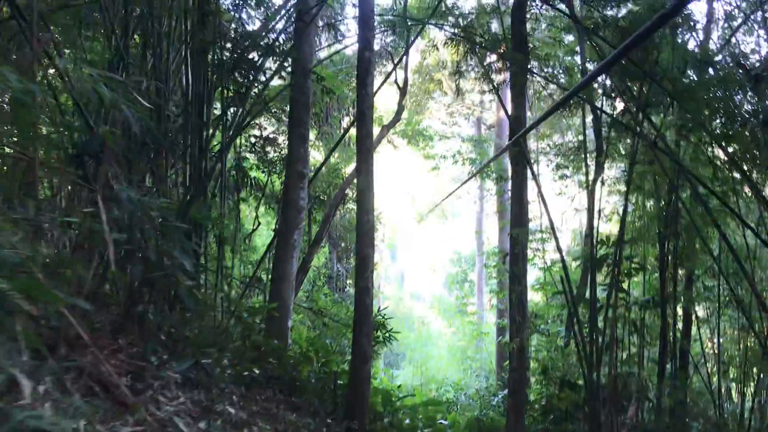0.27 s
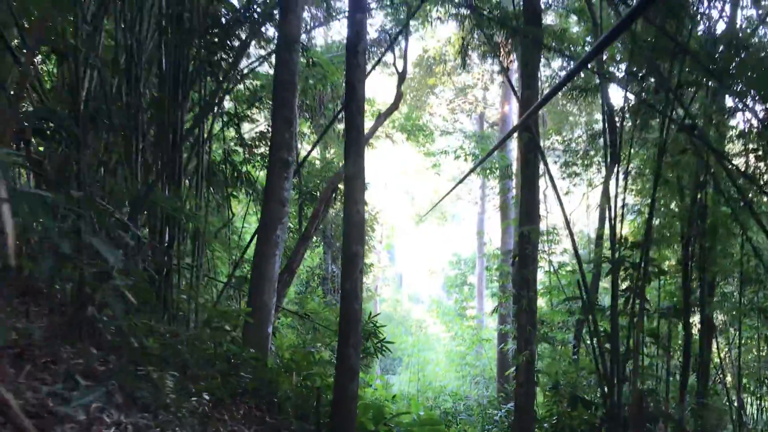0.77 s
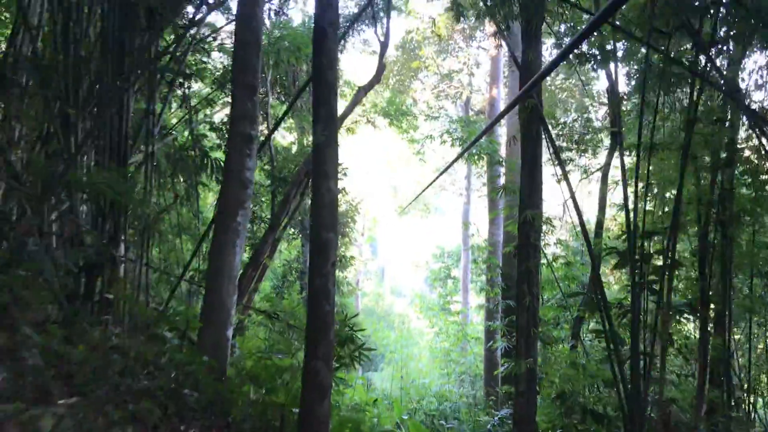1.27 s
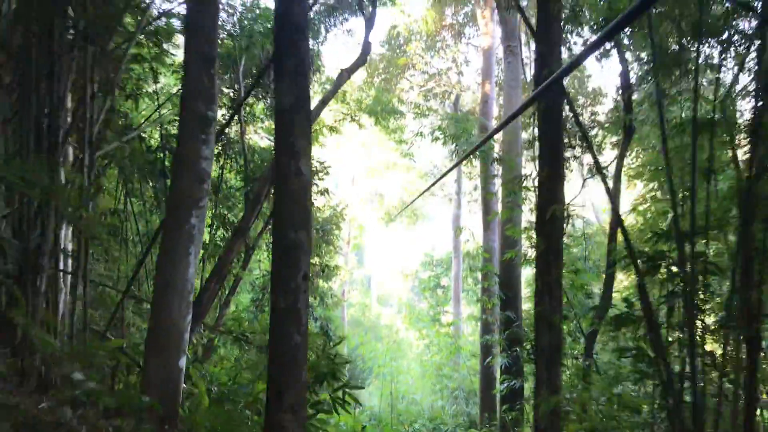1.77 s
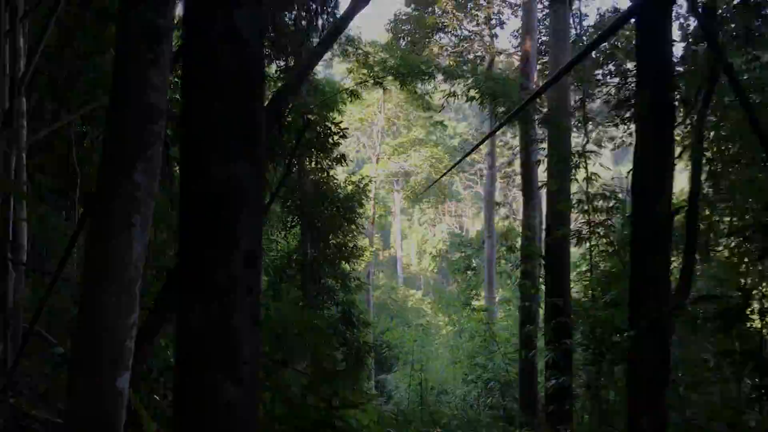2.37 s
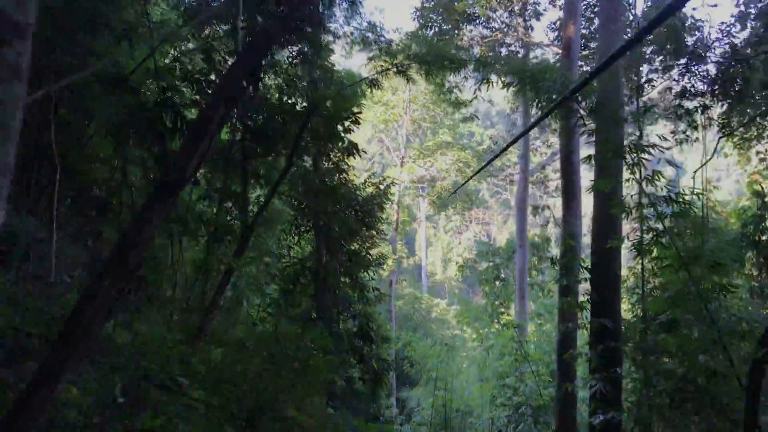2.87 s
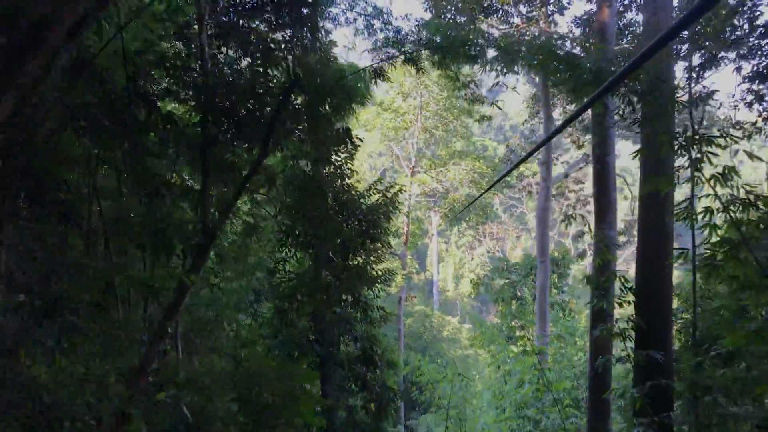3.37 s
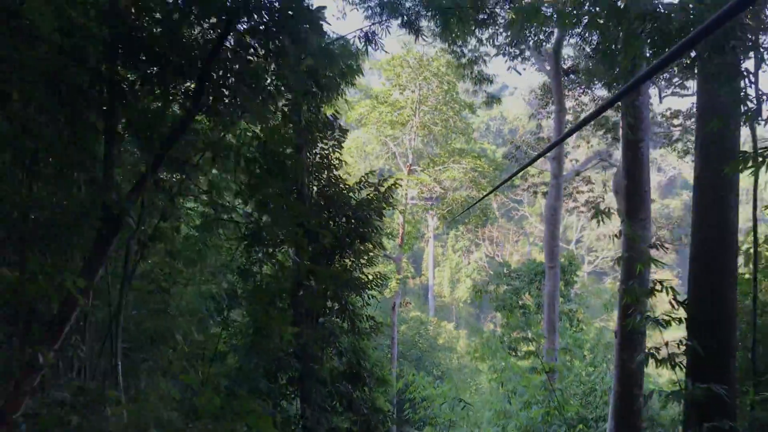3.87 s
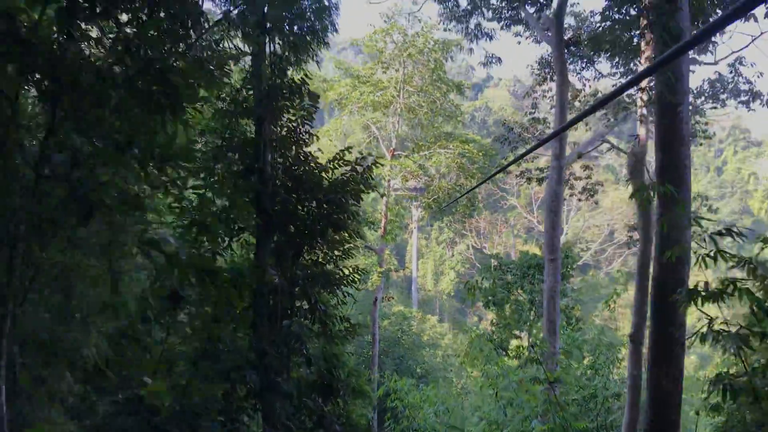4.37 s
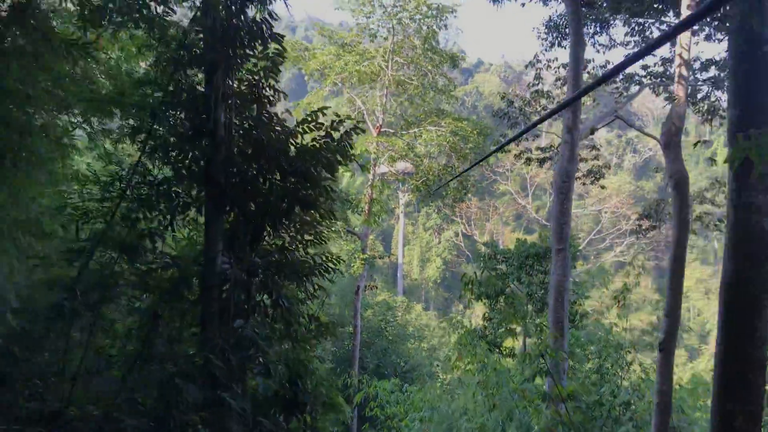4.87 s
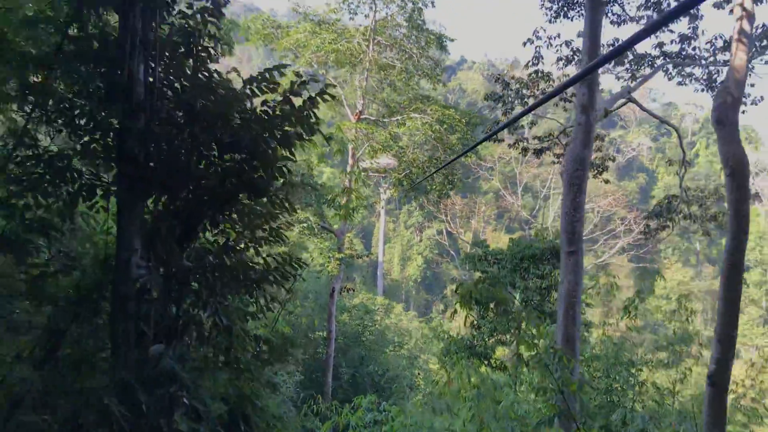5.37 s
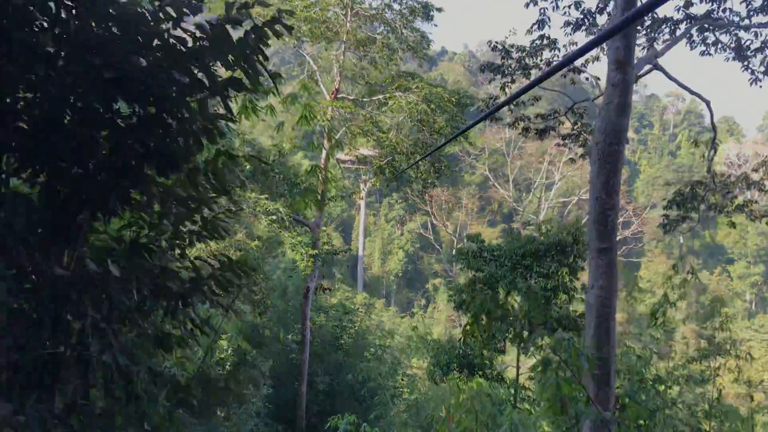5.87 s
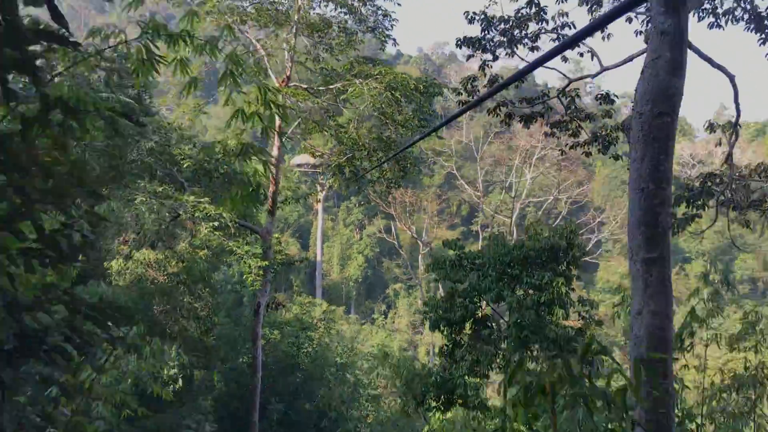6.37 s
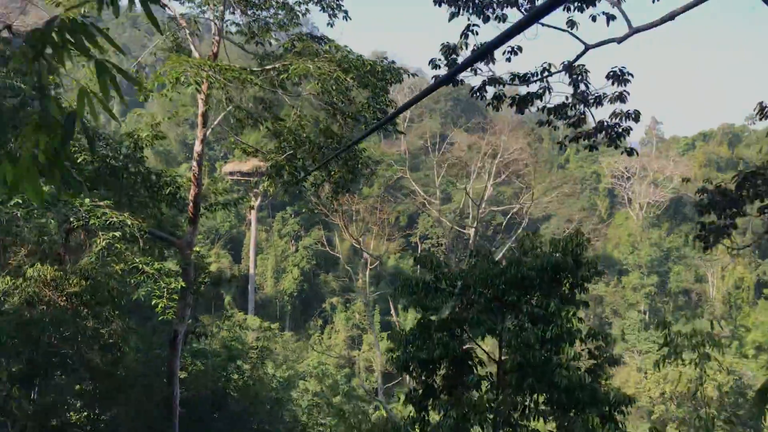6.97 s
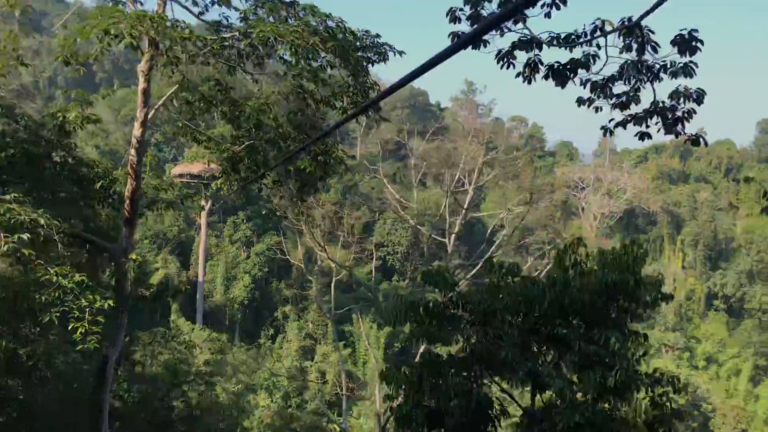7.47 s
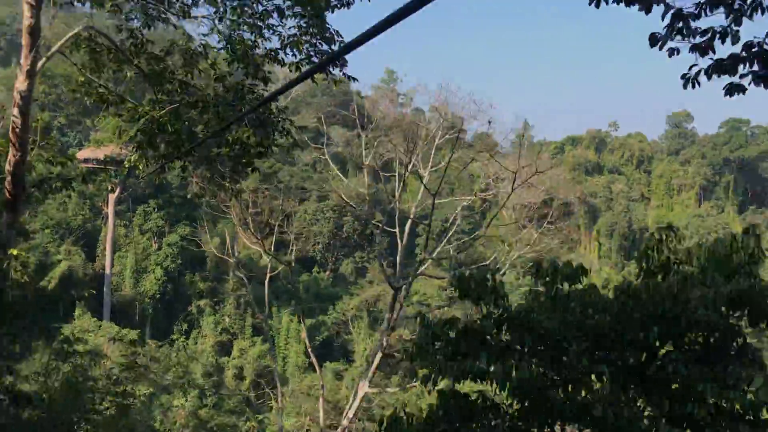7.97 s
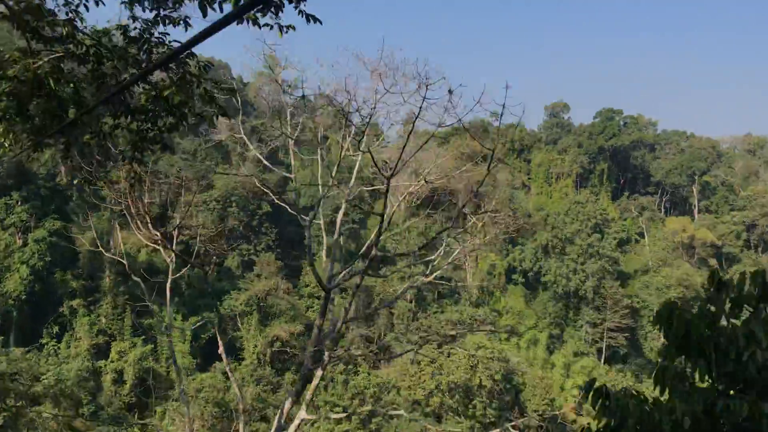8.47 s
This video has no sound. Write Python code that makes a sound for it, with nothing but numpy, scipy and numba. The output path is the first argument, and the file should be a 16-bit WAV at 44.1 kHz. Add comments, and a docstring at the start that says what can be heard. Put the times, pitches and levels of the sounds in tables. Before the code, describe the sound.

A two-wheeled trolley runs down a steel cable just above a phone, moving from the first instant. At 0 s it is a grainy, rather subdued metallic whir with fine ticks. Over the first 2 s it speeds up quickly, growing louder as drumming strands form a buzzing whine that slides upward. Around 2.5-3.5 s the rolling is fullest, ringing hard in the steel frame; near 4 s it eases slightly. From 4 to 7 s the climb slows, with neighbouring tones flaring and dropping in turn and a slight pitch shudder around 5.2 s and again near 7.3 s. The ticks fuse into a bright, sizzling hiss that gains on the body. Faint bass wind buffets, soft rushing air and a low leafy hush stay far underneath. At about 8.7 s it stops abruptly, still fast and high. Close, dry, outdoor mono sound.

```python
"""Trolley on a steel cable

A two-wheeled trolley rolls faster and faster down a steel cable, just above the rider's phone.
The cable strands drum on the wheels and whine in sine lines that climb with the wheel speed. Noise for
grit, bearings and uneven strands rings in the steel frame, under a bright top hiss with tiny cracks.
Filtered noise makes the faint wind rumble, the air rushing past and a low forest hush."""
import sys
import numpy as np
from scipy import signal
from scipy.fft import rfft, irfft, next_fast_len
from scipy.io import wavfile
from scipy.ndimage import uniform_filter1d
from numba import njit

SR = 44100
rng = np.random.default_rng(int(sys.argv[2]) if len(sys.argv) > 2 else 0)


def wav_record(signal):
    """Record a signal, one row per channel, as 16-bit PCM in the file named by sys.argv[1]."""
    frames = np.transpose(np.atleast_2d(signal))
    bounded = np.clip(frames, -1, 1)
    # unit amplitude maps onto the largest positive 16-bit level
    quanta = np.round(bounded * 32767).astype(np.int16)
    wavfile.write(sys.argv[1], SR, quanta)


N = 384993  # length [samples]

SLOW_HZ, FAST_HZ = 25, 90  # wheel speeds between which the "even steps of speed" below are spread [turns/s]
SIZZLE_HZ = 4700  # where the rolling body gives way to sizzle
TOP_HZ = 15750  # the phone passes nothing much above this
SETTLE_S, SETTLE_DB = 0.3, -12  # whine and comb start softer, until the wheels settle on the cable

# Air
# colour of the wind on the microphone: (frequency [Hz], relative level [dB per Hz])
WIND_COLOUR = [(20, -26), (32, -10), (45, 4.5), (70, 6.5), (130, -4.5), (250, -26), (600, -41)]
# wind level at low, middle and full speed: (level [dB], ...)
WIND_LEVEL_DB = (-65.5, -58.5, -56)
# short gusts: (middle [s], time to fall to 37 % [s], peak level [dB])
GUSTS = [(3.17, .05, -49), (3.42, .07, -54), (3.91, .05, -51.5), (4.037, .04, -54), (5.25, .03, -49),
         (6.21, 0.055, -61), (6.93, .04, -63), (7.01, .04, -53), (7.44, .05, -54), (7.98, 0.04, -57)]
# colour of the forest hush: (frequency [Hz], relative level [dB per Hz])
FOREST_COLOUR = [(150, -14), (250, -8.5), (320, 2.5), (400, -13.5), (550, -3.5), (700, 0), (1500, -17)]
# low hush of leaves: (time [s], level [dB])
HUSH_LEVEL = [(0, -49.5), (1, -54), (3, -56), (4, -63), (6, -68), (7, -58), (8.73, -55)]
# colour of the air rushing past the phone: (frequency [Hz], relative level [dB per Hz])
RUSH_COLOUR = [(60, -10), (130, 1), (200, 2.5), (280, -3.5), (400, -23), (800, -30.5)]
# level of that rush at even steps of speed: (level [dB], ...)
RUSH_LEVEL_DB = (-66, -65, -63.5, -61.5, -57)

# Wheel speed
# steady part of the speed: (time [s], wheel speed [turns/s])
WHEEL_SPEED = [(0, 24.6), (.14, 25.5), (.43, 28.6), (.75, 32.5), (1.4, 39.1), (2.0, 45.3), (2.5, 50.55),
               (2.7, 51.35), (3.07, 55.4), (3.4, 58.6), (3.74, 61.3), (4.05, 63.85), (4.3, 65.7),
               (4.7, 69.0), (5.17, 72.3), (5.45, 74.2), (6.0, 77.7), (6.6, 81.25), (7.0, 83.2), (7.3, 84.8),
               (7.8, 87.2), (8.3, 89.3), (8.73, 90.4)]
# short bouts of shudder: (middle [s], shudder rate [Hz], time to fall to 37 % [s], depth [turns/s])
SHUDDERS = [(5.165, 4.25, .4, .6), (5.72, 5.0, .15, .3), (7.28, 5.2, .45, .65), (7.79, 5.8, .2, .35),
            (8.585, 5.0, .14, .6)]

# Rolling noise
# rolling level before a fixed lift: (time [s], level [dB])
ROLL_LEVEL = [(0, -30), (.7, -28.5), (1.4, -25.5), (2.1, -23.5), (2.8, -22.5), (3.5, -22.5), (3.85, -25),
              (4.2, -26), (4.9, -24), (5.6, -24.5), (6.3, -25), (7.0, -25.5), (7.9, -26), (8.4, -24.5),
              (8.73, -25.5)]
# frame and wheel resonances: (frequency [Hz], width at half gain [Hz], gain [dB])
FRAME_RINGS = [(918, 216, -19), (1020, 190, -18.5), (1366, 138, -10), (1574, 251, 2), (2006, 130, -1),
               (2453, 520, -2), (2656, 210, -3), (2980, 270, -8), (3857, 565, -2.5), (5060, 1600, -40),
               (6080, 300, -19.5), (6520, 620, -10.5), (7290, 220, -16)]
# what the frame passes between the rings: (frequency [Hz], gain [dB])
FRAME_BED = [(200, -37), (500, -91), (800, -39), (2000, -2), (5500, -20), (9000, -22.5)]
# bearing rumble and uneven strands, as climbing bands: (centre [cycles/turn], width [cycles/turn])
STRAND_BANDS = [(5.2, 1.6), (25, 5), (36, 9), (51.5, 8), (78, 12), (100, 14)]
# how hard each band drives the frame, against the grit, at even steps of speed: (level [dB], ...)
STRAND_BANDS_DB = [(-19.5, -19.5, -18, -44), (-9.5, -13, -15.5, -15), (-5.5, -23.5, -22.5, -12),
                   (-6.5, -18, -14.5, -11.5), (-13, -17.5, -21, -15.5), (-20, -23, -15, -10)]
# sizzle against the rolling level, at even steps of speed: (level [dB], ...)
SIZZLE_LEVEL_DB = (-10.5, -5.5, -4.5, -.5)
# top hiss against the rolling level, at even steps of speed: (level [dB], ...)
TOP_LEVEL_DB = (-28, -18.5, -11, -8)
# high rings: (frequencies at even steps of speed [Hz], levels at low and full speed [dB], width [Hz])
HIGH_RINGS = [((9350, 9720, 9400, 10530), (1, -2.2), 990), ((12300, 12050, 11800, 12050), (-4.5, -1), 1100),
              ((14000, 14200, 14450, 14650), (0.5, 3), 1100)]
# shared level, added to each ring's own: (time [s], level [dB])
HIGH_RING_LEVEL = [(0, -64.5), (1, -50.5), (2, -39.5), (2.7, -37), (3.5, -39), (4.2, -43), (5, -45),
                   (6, -39.5), (7.6, -41), (8.2, -42), (8.73, -39)]

# Tones locked to the wheel
# fainter lines, among them the comb of the second wheel: (rate [cycles/turn], ...)
FAINT_ORDERS = [5.14, 6.03, 17.66, 18.41, 19.41, 19.61, 20.39, 21.61, 22.61, 24.62, 27.41]
# their strength before they grow with speed and the frame colours them: (level [dB], ...)
FAINT_LINES_DB = [-30.5, -39, -30.5, -42, -30, -30.5, -29.5, -23.5, -29.5, -25, -25.5]
# comb around double the strand rate: (rate [cycles/turn], ...)
COMB_ORDERS = [45.82, 46.8, 47.78, 48.86, 49.83, 51.7, 53.06, 54.02, 55.0]
# strength of each line within the comb: (level [dB], ...)
COMB_LINES_DB = [-7.5, -6, -3, -6, -7, -9, -12, -8, -4]
# strength of the whole comb at even steps of speed: (level [dB], ...)
COMB_STRENGTH_DB = (-21, -20.5, -21, -21, -21.5, -24.5)
# strongest lines: a bearing line, then the strand rate and its double, split by the turning wheel:
# (rate [cycles/turn], ...)
MAIN_ORDERS = [12.03, 21.39, 22.39, 23.39, 24.39, 25.39, 26.41, 50.78, 52.86]
# strength of each strong line: (at low speed [dB], at middle speed [dB], at full speed [dB])
MAIN_LINES_DB = [(-6, 0, 4.5), (-3, 0, -8.5), (-13, -3, -9.5), (-3, 3.5, -4), (-10, 6.5, 0.5),
                 (4, -6.5, -9.5), (-4, 6, -0.3), (-5, -7.5, -16.5), (-7.5, -12, -13.5)]
# a strong line is loud while it climbs through a ring of the wheels: (frequency [Hz], gain [dB])
WHINE_RINGS = [(300, -79), (700, -71), (950, -56.5), (1200, -47.5), (1350, -39.5), (1450, -38), (1530, -35),
               (1620, -28.5), (1720, -33.5), (1850, -36.5), (1970, -32.5), (2070, -27), (2170, -30.5),
               (2280, -31), (2420, -35.5), (2580, -28), (2750, -28), (3050, -31.3), (3400, -28),
               (3750, -18.5), (4100, -19.5), (4800, -50.7)]
# single lines flare or drop for a while: (middle [s], rate [cycles/turn], time to fall to 37 % [s], lift [dB])
FLARES = [(.66, 52.86, .2, 8), (.75, 50.78, .11, -18), (1.4, 52.86, .25, 9), (1.7, 50.78, .15, 7),
          (2.18, 50.78, .24, 15), (2.5, 50.78, .18, 6), (2.66, 25.39, .8, 14.9), (3.1, 52.86, .12, 9),
          (3.28, 26.41, .12, 6), (3.45, 24.39, .12, 3), (3.69, 24.39, .49, 13.5), (3.75, 50.78, .35, 6),
          (4.25, 23.39, .08, -14.1), (4.25, 25.39, .67, 10.5), (4.56, 21.39, .13, 11.8),
          (4.56, 23.39, .14, 6.7), (4.72, 26.41, .24, -11.2), (5.04, 22.39, .8, 11.9),
          (5.36, 21.39, .25, 8.9), (5.36, 23.39, .1, 7.6), (5.44, 22.39, .11, -20),
          (5.44, 25.39, .59, 14.4), (5.99, 22.39, .19, 9.2), (6.39, 24.39, .36, 8), (6.79, 26.41, .26, 7),
          (7.1, 23.39, .18, 9), (7.3, 26.41, .12, 5), (7.5, 24.39, .3, 4), (7.7, 26.41, .15, 5),
          (7.72, 23.39, .2, 6), (7.98, 25.39, .23, 15.5), (8.13, 23.39, .09, -9.3), (8.55, 24.39, .35, 5.8),
          (8.61, 25.39, .3, 12)]


def undb(db):
    """Turn a level in dB into a gain."""
    return 10 ** (np.asarray(db) / 20)


def unit(x):
    """Scale a signal to rms 1."""
    return x / np.sqrt(np.mean(x ** 2))


def curves(table):
    """Join the points of each column of a table by straight lines in time."""
    seconds, *columns = np.transpose(table)
    return [np.interp(np.arange(N) / SR, seconds, column) for column in columns]


def by_speed(wheel_hz, values):
    """Read a value given at evenly spaced speeds from slow to fast."""
    return np.interp(wheel_hz, np.linspace(SLOW_HZ, FAST_HZ, len(values)), values)


def bump(middle_s, half_s):
    """Make a bell of height 1 around a moment, down to 37 % at half_s to either side."""
    return np.exp(-((np.arange(N) / SR - middle_s) / half_s) ** 2)


def walk(rate):
    """Wander at random: new levels at this rate [Hz], smoothed twice; typical spread about 1.5."""
    hold = int(SR / rate)
    steps = np.repeat(rng.standard_normal(N // hold + 1), hold)
    return 1.99 * uniform_filter1d(uniform_filter1d(steps, hold), hold)[:N]


def slope(points, hz):
    """Read a gain from (frequency, dB) points, joined along log frequency."""
    f, db = np.transpose(points)
    return undb(np.interp(np.log(hz + 1), np.log(f), db))


def above(hz, edge_hz):
    """Rise smoothly from 0 below an edge to 1 above it."""
    return 1 / (1 + (edge_hz / (hz + 1)) ** 10)


def colour(x, gain_at):
    """Filter a signal with a gain given as a function of frequency."""
    size = next_fast_len(N)
    hz = np.arange(size // 2 + 1) * SR / size
    return irfft(rfft(x, size) * gain_at(hz), size)[:N]


@njit
def band(x, hz, width):
    """Band-pass filter whose centre and width can move; gain 1 at the centre."""
    y, b, l = np.empty(len(x)), 0., 0.
    for i in range(len(x)):
        g, k = np.tan(np.pi * hz[i] / SR), width[i] / hz[i]
        v = (b + g * (x[i] - l)) / (1 + g * (g + k))
        b, l, y[i] = 2 * v - b, l + 2 * g * v, k * v
    return y


def coloured_noise(points):
    """Shape white noise to a spectrum, rms 1."""
    return unit(colour(rng.standard_normal(N), lambda hz: slope(points, hz)))


def air(wheel_hz):
    """Wind buffets the microphone in the bass; air rushes past over a faint forest hush."""
    buffet = undb(by_speed(wheel_hz, WIND_LEVEL_DB) + 2.0 * walk(14))
    gusts = sum(undb(db) * bump(s, half) for s, half, db in GUSTS)
    wind = (buffet + gusts) * coloured_noise(WIND_COLOUR)
    hush_db = curves(HUSH_LEVEL)[0] + 1.5 * walk(5)
    rush_db = by_speed(wheel_hz, RUSH_LEVEL_DB) + 1.5 * walk(8)
    hush = undb(hush_db) * coloured_noise(FOREST_COLOUR)
    rush = undb(rush_db) * coloured_noise(RUSH_COLOUR)
    return wind + hush + rush


def wheel():
    """Wheel turns per second: a steady climb, slightly unsteady, with bouts of shudder."""
    t = np.arange(N) / SR
    shudder = sum(depth * bump(s, half) * np.cos(2 * np.pi * hz * (t - s))
                  for s, hz, half, depth in SHUDDERS)
    return curves(WHEEL_SPEED)[0] + shudder + 0.06 * walk(9)


def frame(hz):
    """Gain of the steel frame: steep resonances over a weak bed, added as power."""
    rings = sum(undb(2 * db) / (1 + (2 * (hz - f) / width) ** 2) ** 2 for f, width, db in FRAME_RINGS)
    return np.sqrt(rings + slope(FRAME_BED, hz) ** 2)


def grit(turns):
    """Dense noise grains of uneven size, beating once and twice a turn and fluttering at random."""
    grains = rng.standard_normal(N) * undb(walk(400))
    beat = 1 + 0.059 * np.cos(4 * np.pi * turns) + 0.064 * np.cos(2 * np.pi * turns)
    flutter_db = 0.43 * walk(40)
    swell_db = 0.6 * walk(7)
    return unit(grains * beat * undb(flutter_db + swell_db))


def ticks(wheel_hz):
    """Lone specks crack under the wheels: about four a turn, so they fuse into hiss at speed."""
    hit = rng.random(N) < 4.0 * wheel_hz / SR
    size = undb(-14 * rng.random(N))
    # each crack is a noise burst that dies away within 2 ms
    burst = np.convolve(hit * size / np.sqrt(wheel_hz), np.exp(-np.arange(90) / 20))[:N]
    return unit(burst * rng.standard_normal(N))


def strand_roar(wheel_hz):
    """Bearing rumble and uneven strands: noise in bands that climb with the wheel speed."""
    roar = 0
    for (order, width), db in zip(STRAND_BANDS, STRAND_BANDS_DB):
        centre, wide = order * wheel_hz, width * wheel_hz
        once = band(rng.standard_normal(N), centre, wide)
        twice = band(once, centre, wide)  # a second pass steepens the edges
        roar = roar + undb(by_speed(wheel_hz, db)) * unit(twice)
    return roar


def line(turns, order, waver, flicker_db):
    """One sine locked to the wheel, rms 1 before flicker; a wandering contact sways phase and level."""
    phase = 2 * np.pi * (order * turns + rng.random()) + waver * walk(22)
    return np.sqrt(2) * undb(flicker_db * walk(14)) * np.sin(phase)


def faint_lines(turns, wheel_hz):
    """Faint wheel-locked tones that emerge from the grit as speed grows."""
    lines = sum(undb(db) * line(turns, order, waver=0.69, flicker_db=3.5)
                for order, db in zip(FAINT_ORDERS, FAINT_LINES_DB))
    return (wheel_hz / 70) ** 1.4 * lines


def strand_comb(turns, wheel_hz):
    """Strands passing under the turning wheel: a comb of tones around double their rate."""
    comb = sum(undb(db) * line(turns, order, waver=0.65, flicker_db=3.0)
               for order, db in zip(COMB_ORDERS, COMB_LINES_DB))
    return undb(by_speed(wheel_hz, COMB_STRENGTH_DB)) * comb


def whine(turns, wheel_hz):
    """The strong lines swell as they cross the rings, fade at random and now and then flare or drop."""
    out = 0
    for order, db in zip(MAIN_ORDERS, MAIN_LINES_DB):
        flare_db = sum(lift * bump(s, half) for s, flaring, half, lift in FLARES if flaring == order)
        fade_db = 0.5 * walk(5)
        gain = slope(WHINE_RINGS, order * wheel_hz) * undb(by_speed(wheel_hz, db) + flare_db + fade_db)
        out = out + gain * line(turns, order, waver=0.26, flicker_db=0.82)
    return out


def high_rings(crackle, wheel_hz):
    """High resonances, drifting in pitch with speed, rung by the crackling hiss."""
    level_db, = curves(HIGH_RING_LEVEL)
    out = 0
    for hz, db, width_hz in HIGH_RINGS:
        ring = band(crackle, by_speed(wheel_hz, hz), np.full(N, float(width_hz)))
        out = out + undb(level_db + by_speed(wheel_hz, db)) * unit(ring)
    return out


def trolley(wheel_hz):
    """Grit, roar and fainter tones shake the frame; top hiss, high rings and strong whine add to it."""
    turns = np.cumsum(wheel_hz) / SR
    roll_db, = curves(ROLL_LEVEL)
    settle = undb(SETTLE_DB * bump(0, SETTLE_S))
    hiss = grit(turns)
    drive = hiss + faint_lines(turns, wheel_hz) + settle * strand_comb(turns, wheel_hz)
    drive = drive + strand_roar(wheel_hz)
    # slow rolling lets single ticks stand out of the top hiss
    tick_gain = undb(-5.0) * (45 / wheel_hz) ** 1.3
    crackle = unit(hiss + tick_gain * ticks(wheel_hz))
    body = colour(drive, lambda hz: frame(hz) * (1 - above(hz, SIZZLE_HZ)))
    sizzle = colour(drive, lambda hz: frame(hz) * above(hz, SIZZLE_HZ) * (1 - above(hz, 8360)))
    top = colour(crackle, lambda hz: above(hz, 8240) * (hz / 8300 + .1) ** -.4)
    # sizzle and top hiss gain on the body as speed grows
    out = undb(roll_db + 4.5) * unit(body)
    out += undb(roll_db + by_speed(wheel_hz, SIZZLE_LEVEL_DB)) * unit(sizzle)
    out += undb(roll_db + by_speed(wheel_hz, TOP_LEVEL_DB)) * unit(top)
    return out + high_rings(crackle, wheel_hz) + settle * whine(turns, wheel_hz)


def scene():
    """Moving air and the trolley overhead, on one microphone."""
    wheel_hz = wheel()
    return (air(wheel_hz) + trolley(wheel_hz))[None]


def record(dry):
    """The phone cuts the top steeply."""
    return signal.sosfilt(signal.ellip(14, .2, 95, TOP_HZ, fs=SR, output="sos"), dry)


dry = scene()
out = record(dry)
wav_record(out)
```